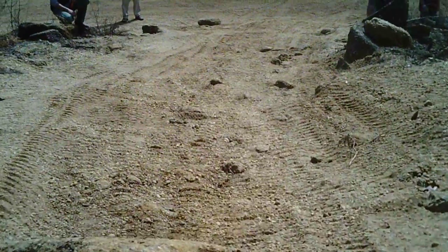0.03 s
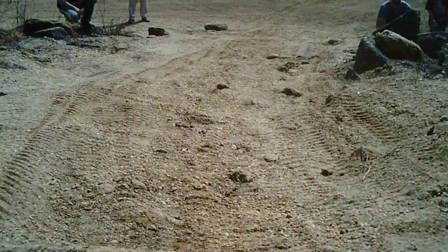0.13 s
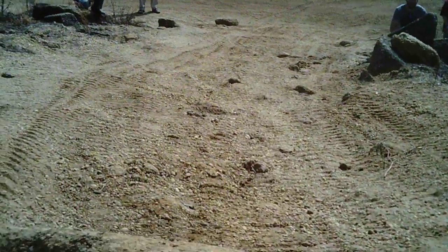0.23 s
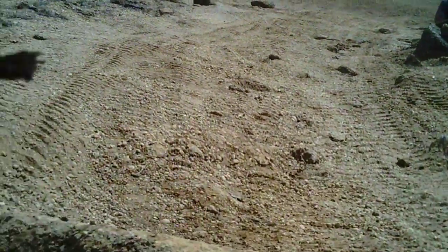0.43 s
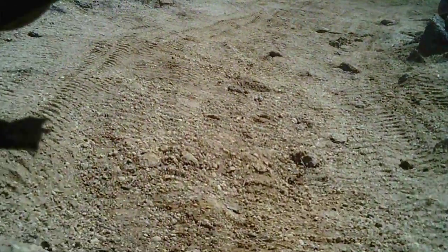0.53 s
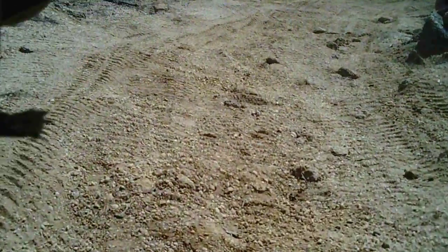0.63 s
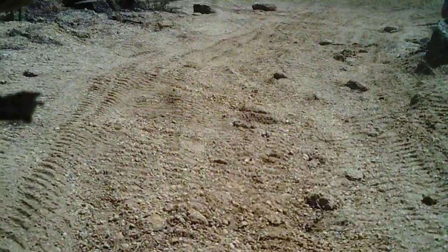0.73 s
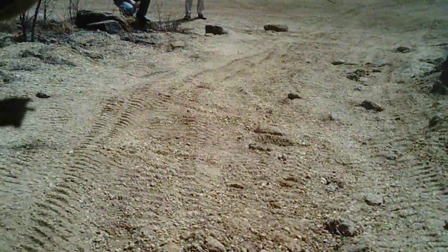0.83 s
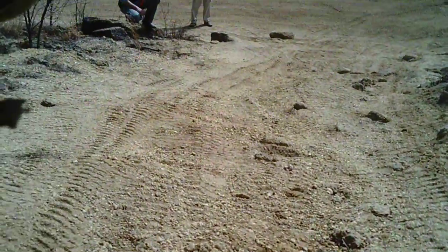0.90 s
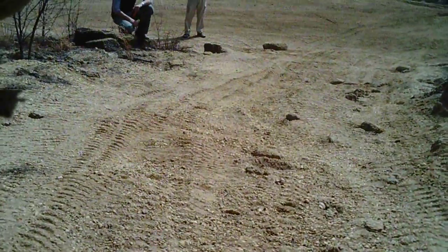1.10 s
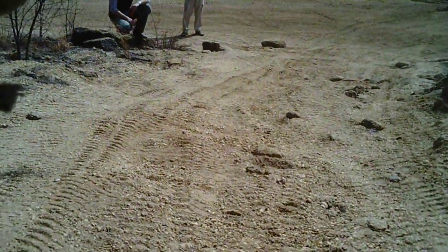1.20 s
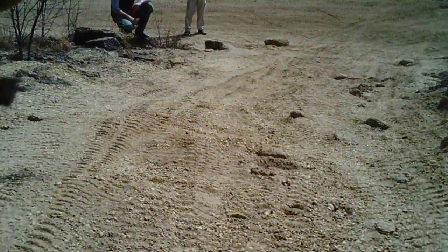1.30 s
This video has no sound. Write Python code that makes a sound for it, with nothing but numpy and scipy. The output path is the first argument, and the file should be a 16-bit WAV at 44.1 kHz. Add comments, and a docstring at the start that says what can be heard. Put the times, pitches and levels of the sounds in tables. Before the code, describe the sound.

Off-road vehicle engine booms over a bump, with suspension clunks and crunching gravel.

```python
"""The exhaust of an off-road vehicle booms under load and falls back as it crawls over a bump.
Heard from a camera on the vehicle, the suspension bottoms out in a run of clunks that excite the modes
of the chassis and the camera mount; the loudest peaks overload the microphone. Behind them the engine
clatters, the drivetrain drones, body and wind rumble, and tyres crunch on the dirt track as stones tick."""
import sys
import numpy as np
from scipy import signal
from scipy.fft import rfft, irfft
from scipy.io import wavfile
from scipy.ndimage import uniform_filter1d

SR = 44100
rng = np.random.default_rng(int(sys.argv[2]) if len(sys.argv) > 2 else 0)


def dump(signal):
    """Clip the signal to [-1, 1] and save it as 16-bit WAV at the path in sys.argv[1]."""
    limited = np.clip(np.atleast_2d(signal).T, -1, 1)
    pcm = np.round(limited * 32767).astype(np.int16)
    wavfile.write(sys.argv[1], SR, pcm)


N = 59535
T = np.arange(N) / SR

# Spectra of the four noises. Each row: frequency in Hz, relative spectral density in dB.
BODY_SPECTRUM = [(70, -15), (100, 1), (150, 1), (200, 3.5), (240, -6), (315, -13.5), (365, -0.5), (430, -9),
                 (500, -21.5), (800, -23), (1100, -20)]
WIND_SPECTRUM = [(10, -20), (25, 6), (45, 6), (70, 8.5), (110, -37.5), (250, -21)]
GRIT_SPECTRUM = [(400, -17.5), (900, 11), (1900, 2), (2650, 4.5), (3800, -9.5), (4600, 1), (5600, -17.5),
                 (7000, -46)]
CLATTER_SPECTRUM = [(450, -27.5), (850, -26), (1050, -15.5), (1190, 4.5), (1380, -1.5), (1550, -9),
                    (1800, -27), (2600, -21.5), (3800, -35), (4600, -32.5), (6000, -57)]
# Envelopes of body shake, tyre grit and engine clatter. Each row: time in seconds, rms level in dB.
SHAKE_LEVEL = [(0, -29.5), (.19, -49), (.245, -23), (.28, -20.5), (.38, -22), (.48, -20), (.54, -26),
               (.62, -34), (.75, -30.5), (.81, -38.5), (1.05, -44), (1.35, -43)]
GRIT_LEVEL = [(0, -53), (.24, -84), (.28, -34.5), (.35, -32), (.45, -53), (.50, -51), (.56, -59),
              (.63, -56), (.67, -50), (.75, -50.5), (.80, -60), (.875, -50), (.93, -64.5), (1.35, -63.5)]
CLATTER_LEVEL = [(0, -40.5), (.25, -36), (.55, -42), (.63, -43), (.70, -37), (.81, -45), (.88, -41.5),
                 (.94, -48), (1.2, -50.5), (1.35, -46.5)]
# Drivetrain tone. Each row: time in seconds, centre frequency in Hz, peak level in dB before flutter.
DRONE_TONE = [(0, 175.5, -45.5), (.2, 159.3, -39.5), (.28, 146.7, -22), (.37, 166.7, -10),
              (.46, 169.8, -13), (.52, 179.4, -19), (.60, 176.3, -38.5), (.88, 176.9, -46.5),
              (1.03, 189.2, -34.5), (1.26, 179.5, -38.5), (1.35, 193.2, -38)]
# Impacts of stones and loose metal. Each row: start in seconds, gain in dB, main ring frequency in Hz.
TICK_IMPACTS = [(0.2768, -32.5, 4440), (0.293, -31, 4930), (0.3058, -22, 5220), (0.3165, -31.5, 5100),
                (.3325, -19, 4860), (.352, -21.5, 5370), (0.3912, -34, 5090), (0.4116, -25.5, 5000),
                (0.4828, -25.5, 5200), (0.5112, -28, 4870), (0.6564, -24.5, 4280)]
# Modes of a tick. Each row: ratio to the main ring frequency, gain in dB, 60 dB decay time in seconds.
TICK_RESONANCES = [(.62, -6.5, 0.012), (.8, -3.5, 0.011), (0.998, 2.5, 0.0087)]
# Suspension impacts. Each row: start in seconds, chassis gain in dB, mount gain in dB, cutoff in Hz.
CLUNK_IMPACTS = [(.135, -22.5, -16, 900), (0.2091, -23, -7, 1542), (0.2623, -9.5, -30, 477),
                 (0.2698, -4, -12.5, 1404), (.322, -13, -5.5, 1400), (0.3624, -1, 5.5, 2260),
                 (0.3737, -2.5, -5, 4700), (0.44, -8, -27.5, 1280), (.458, -12.5, 3, 591),
                 (0.4642, -14.5, 1.5, 4350), (0.482, -21, -19, 1306), (.536, -41, -17, 1300),
                 (.759, -31.5, -19, 1390), (0.833, -43.5, -23, 1475)]
# Chassis and camera mount modes. Each row: frequency in Hz, gain in dB, 60 dB decay time in seconds.
CHASSIS_MODES = [(103.7, -9, .08), (236, -6, 0.062), (352.3, -5, 0.07), (419, -12, 0.069),
                 (510, -32, 0.032)]
MOUNT_MODES = [(930, -26.5, 0.06), (1191, -7.5, 0.045), (1323.6, -10.5, 0.044), (1410, -18, 0.027),
               (2546, -15.5, 0.0071), (3720, -31.5, 0.02)]
# Engine firing. Each row: time in seconds, firing rate in Hz.
FIRING_RATE = [(0.0, 60.47), (0.07, 60.17), (0.13, 46.86), (0.22, 61.14), (0.29, 51.07), (0.37, 48.21),
               (0.41, 59.26), (0.46, 44.33), (0.52, 51.3), (0.6, 43.08), (0.71, 56.4), (0.8, 49.57),
               (0.9, 51.1), (1.35, 58.55)]
# Exhaust envelope. Each row: time in seconds, peak level of the fundamental in dB.
BOOM_LEVEL = [(0, -17.5), (.11, -28.5), (.19, -14), (.258, -7), (.295, 3), (.44, 2.5), (.463, -4),
              (.56, -6.5), (.618, -18), (.66, -7), (.735, -23), (.805, -12), (.855, -18), (.895, -11.5),
              (.955, -23), (1.0, -17.5), (1.045, -29.5), (1.35, -59)]
# Exhaust harmonics 2 to 8. Each entry: level in dB relative to the fundamental.
BOOM_HARMONICS = [-24.5, -32.5, -32.5, -36.5, -40.5, -34.5, -39]


def undb(db):
    return 10 ** (np.asarray(db) / 20)


def curve(table, column=1):
    """Linear interpolation of one column of a table over time."""
    rows = np.array(table, float)
    return np.interp(T, rows[:, 0], rows[:, column])


def colour(x, spectrum):
    """Spectral shaping: a signal is filtered by the given spectrum and scaled to unit rms."""
    hz, db = np.array(spectrum, float).T
    f = np.maximum(np.arange(N // 2 + 1) * SR / N, 1)
    gain = undb(np.interp(np.log(f), np.log(hz), db))
    skirts = np.minimum(f / hz[0], 1) ** 2 * np.minimum(hz[-1] / f, 1) ** 4
    shaped = irfft(rfft(x) * gain * skirts, N)
    return shaped / shaped.std()


def drift(rate_hz):
    """A moving average of random steps gives a slow drift of unit standard deviation."""
    hold = int(SR / rate_hz)
    steps = np.repeat(rng.standard_normal(N // hold + 1), hold)
    smooth = uniform_filter1d(steps, hold)[:N]
    return smooth / smooth.std()


def ring(force, modes):
    """Modal superposition: the force is convolved with a sum of damped sinusoids."""
    response = sum(undb(db) * np.sin(2 * np.pi * hz * T) * np.exp(-np.log(1000) * T / t60)
                   for hz, db, t60 in modes)
    return signal.fftconvolve(force, response)[:N]


def impact(start, cutoff_hz, contact_s, chatter_s, chatter_gain):
    """Contact force: a short push with a burst of chatter; softer contact means less bandwidth."""
    age = np.maximum(T - start, 0)
    push = age * np.exp(-age / (contact_s / 10))
    chatter = age / chatter_s * np.exp(1 - 2 * age / chatter_s) * rng.standard_normal(N)
    soften = signal.butter(4, cutoff_hz, fs=SR, output="sos")
    return signal.sosfilt(soften, push / push.sum() + chatter_gain * chatter + 1e-18)


def tyres(grains_per_s=3000, spread_db=1):
    """Shot noise: dense, randomly timed grains of grit under the tread merge into a crunch."""
    grains = (rng.random(N) < grains_per_s / SR) * rng.standard_normal(N)
    strength = undb(spread_db * np.minimum(rng.exponential(size=N), 4))
    return undb(curve(GRIT_LEVEL)) * colour(grains * strength, GRIT_SPECTRUM)


def ticks():
    """Free vibration: jolted stones and loose metal ring briefly in high, heavily damped modes."""
    out = 0
    for start, db, hz in TICK_IMPACTS:
        force = impact(start, cutoff_hz=5280, contact_s=0.00055, chatter_s=0.0014, chatter_gain=0.22)
        modes = [(hz * ratio, mode_db, t60) for ratio, mode_db, t60 in TICK_RESONANCES]
        out = out + undb(db) * ring(force, modes)
    return out


def clatter(phase, depth=0.35):
    """Amplitude modulation: engine noise throbs at twice the firing rate; the resonant mount colours it."""
    throb = 1 + depth * np.cos(2 * phase)
    return undb(curve(CLATTER_LEVEL)) * colour(throb * rng.standard_normal(N), CLATTER_SPECTRUM)


def drivetrain(waver=0.0071, flutter_db=3.0):
    """Random modulation: a drone wavers in frequency and level as it swells under load."""
    hz = curve(DRONE_TONE) * (1 + waver * drift(rate_hz=30))
    level_db = curve(DRONE_TONE, column=2) + flutter_db * drift(rate_hz=40)
    return undb(level_db) * np.sin(2 * np.pi * np.cumsum(hz) / SR)


def rumble(wind_over_body_db=9):
    """Random excitation: each lurch shakes the body and makes air buffet the microphone."""
    body = colour(rng.standard_normal(N), BODY_SPECTRUM)
    wind = colour(rng.standard_normal(N), WIND_SPECTRUM)
    return undb(curve(SHAKE_LEVEL)) * (body + undb(wind_over_body_db) * wind)


def suspension(mount_cutoff_hz=1080):
    """Impact excitation: each clunk drives the low modes of the chassis and the high ones of the mount."""
    thuds, knocks = 0, 0
    for start, chassis_db, mount_db, cutoff_hz in CLUNK_IMPACTS:
        force = impact(start, cutoff_hz, contact_s=0.0014, chatter_s=0.0044, chatter_gain=0.12)
        thuds = thuds + undb(chassis_db) * force
        knocks = knocks + undb(mount_db) * force
    # The small mount passes little bass.
    highpass = signal.butter(3, mount_cutoff_hz, "highpass", fs=SR, output="sos")
    return ring(thuds, CHASSIS_MODES) + ring(signal.sosfilt(highpass, knocks), MOUNT_MODES)


def exhaust(phase):
    """Harmonic series: periodic firing gives a strong fundamental, the boom, with weak overtones."""
    overtones = sum(undb(db) * np.sin(k * phase) for k, db in enumerate(BOOM_HARMONICS, start=2))
    return undb(curve(BOOM_LEVEL)) * (np.sin(phase) + overtones)


def scene():
    """Superposition: all sources add at one microphone; exhaust and clatter share the firing phase."""
    phase = 2 * np.pi * np.cumsum(curve(FIRING_RATE)) / SR
    engine = exhaust(phase) + clatter(phase)
    return (engine + drivetrain() + rumble() + tyres() + ticks() + suspension())[None]


def record(dry, clip_level=0.71, shelf_hz=5950, shelf_db=-6.5, top_hz=16000):
    """Saturation and band limiting: the microphone clips hard, then the recorder attenuates the treble."""
    clipped = np.clip(dry, -clip_level, clip_level)
    lows = signal.sosfiltfilt(signal.butter(10, shelf_hz, fs=SR, output="sos"), clipped)
    shelved = lows + undb(shelf_db) * (clipped - lows)
    return signal.sosfilt(signal.ellip(8, 0.1, 70, top_hz, fs=SR, output="sos"), shelved)


dry = scene()
out = record(dry)
dump(out)
```